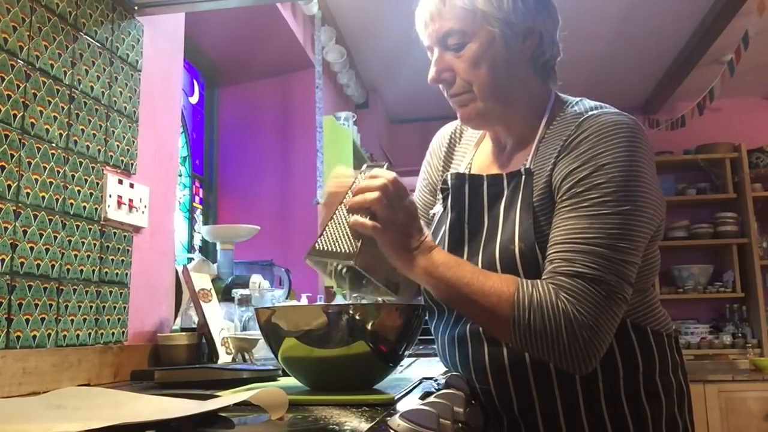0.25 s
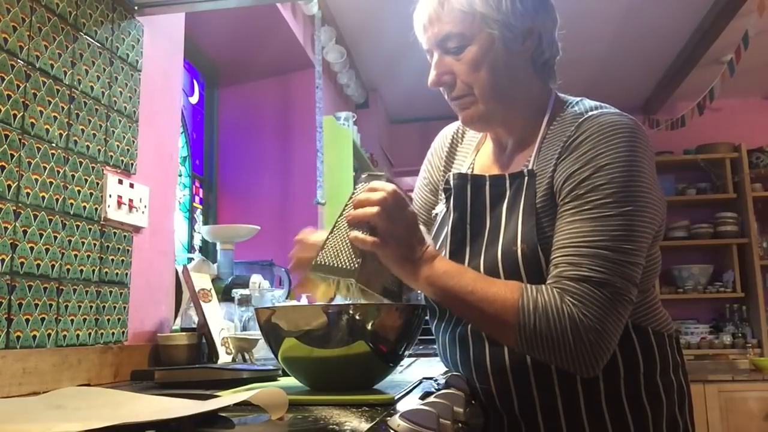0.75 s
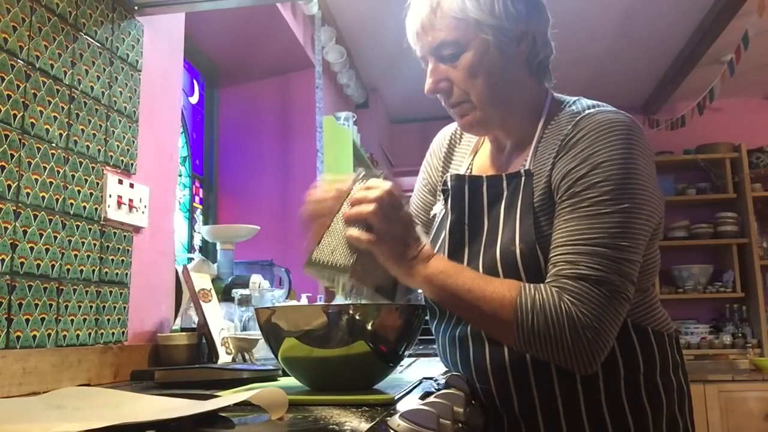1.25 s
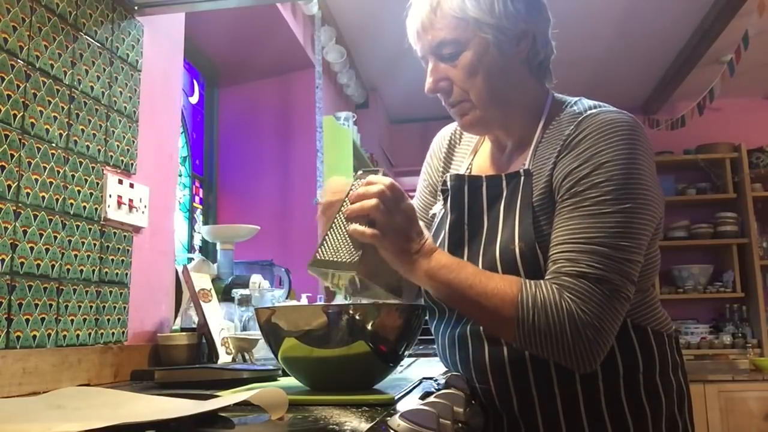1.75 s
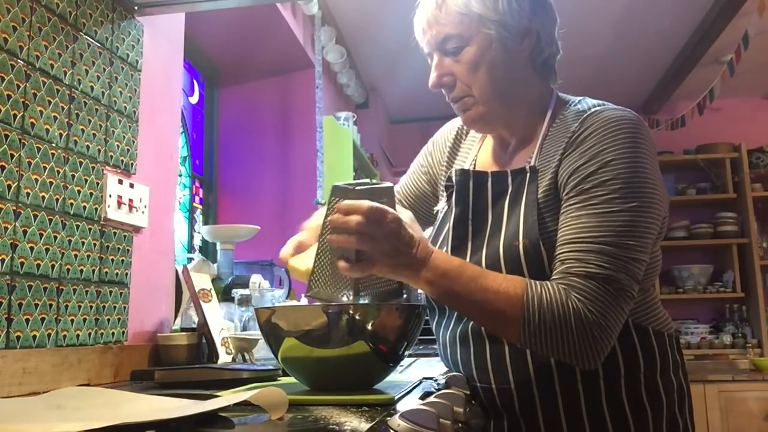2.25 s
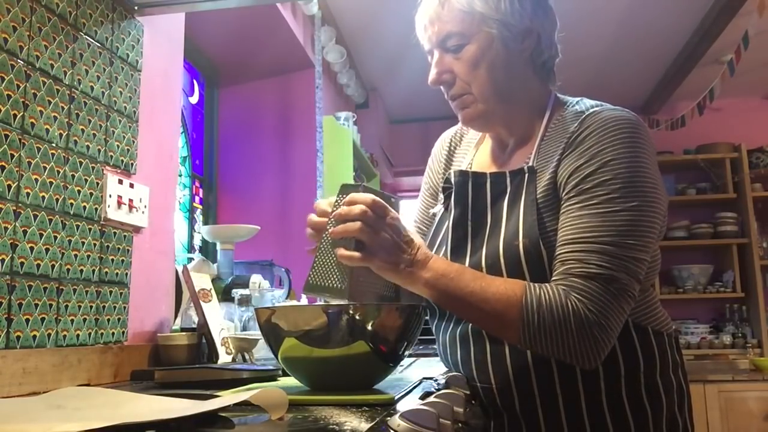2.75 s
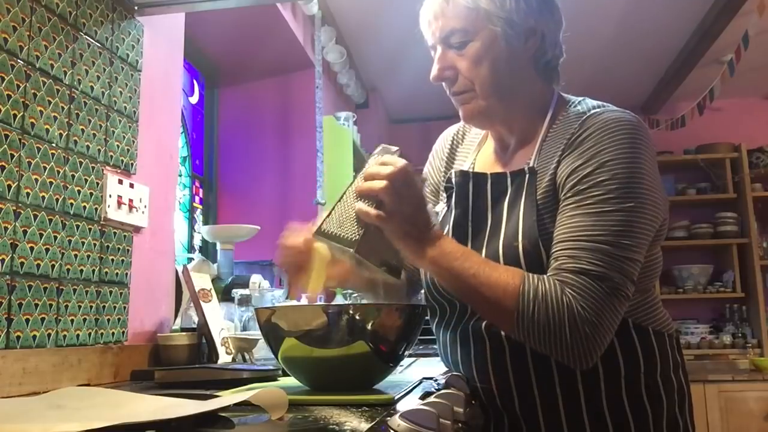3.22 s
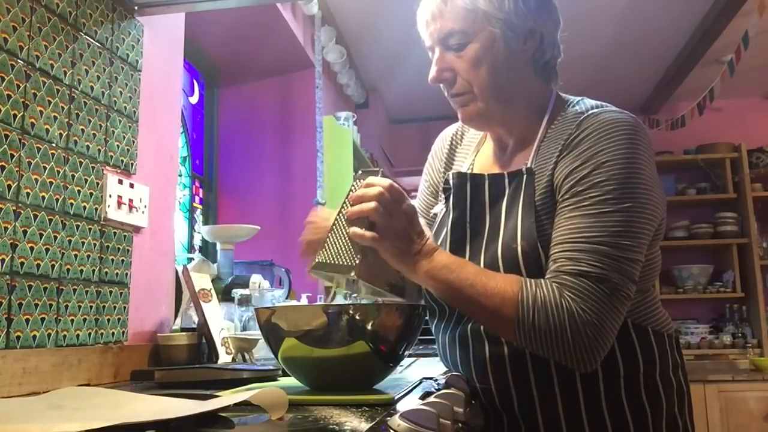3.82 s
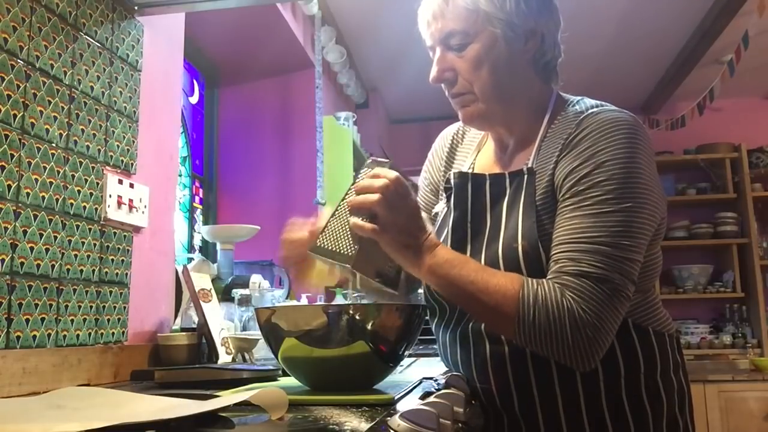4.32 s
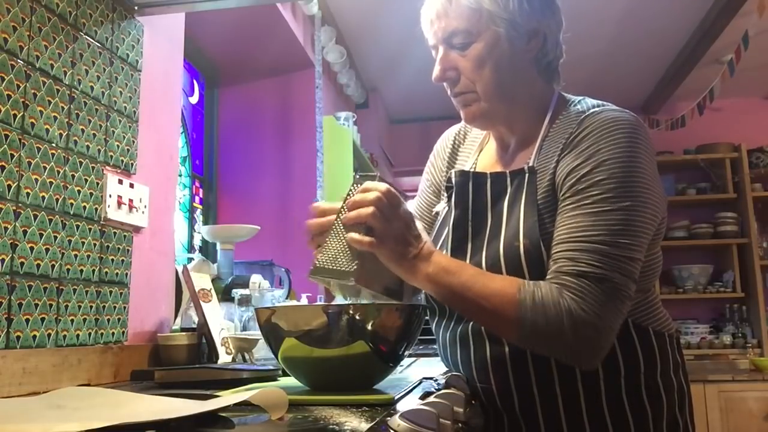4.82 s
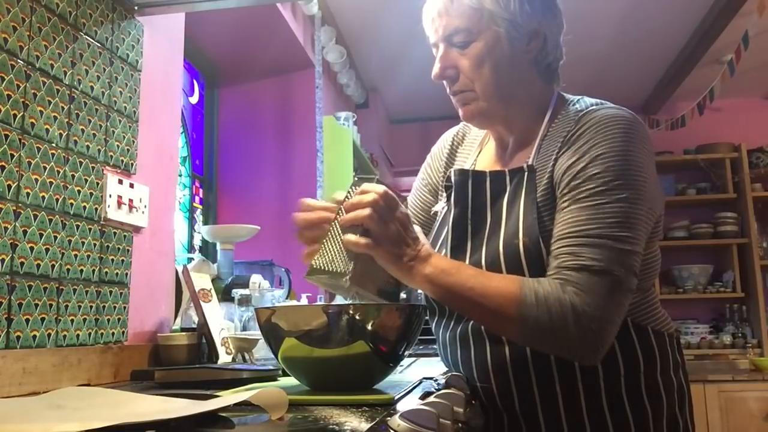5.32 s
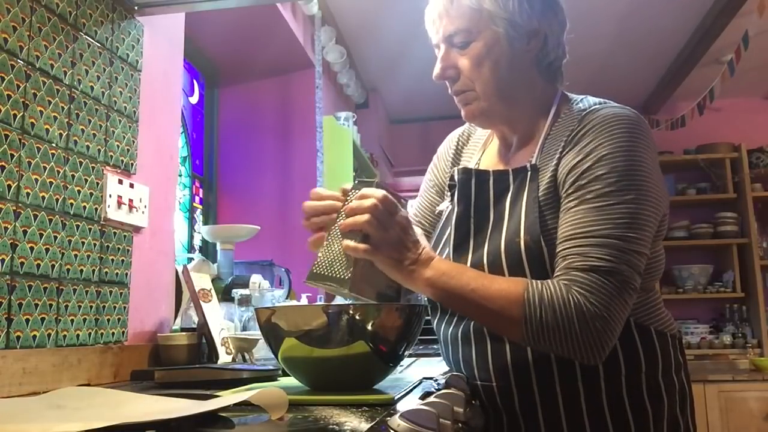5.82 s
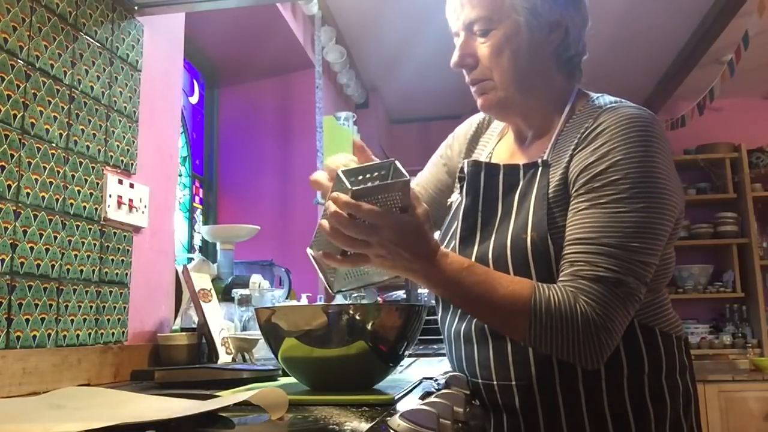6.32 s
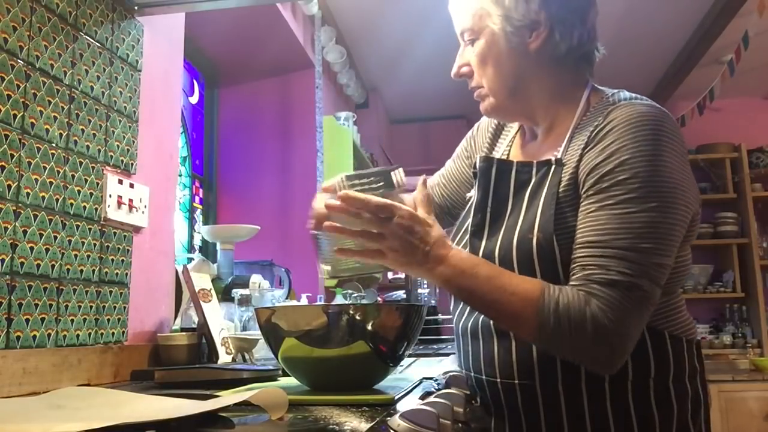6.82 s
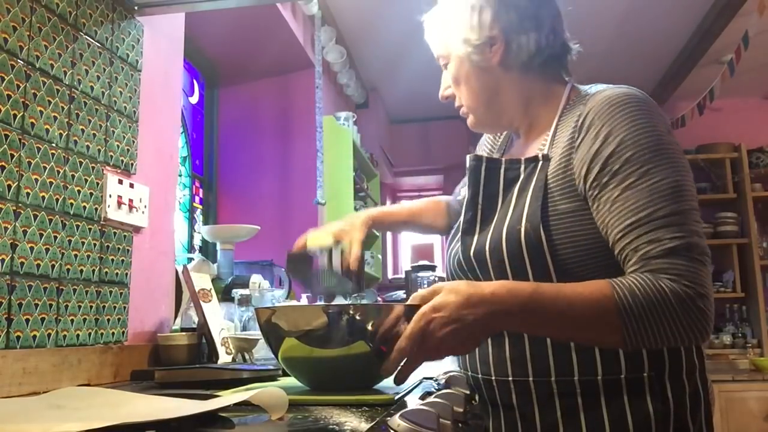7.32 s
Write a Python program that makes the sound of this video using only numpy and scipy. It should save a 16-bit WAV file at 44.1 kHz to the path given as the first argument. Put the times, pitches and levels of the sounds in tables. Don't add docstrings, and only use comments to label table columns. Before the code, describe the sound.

Rustling grater strokes with dull thuds and crisp metallic ticks, followed by loud hollow palm slaps on thin steel, over a faint low motor hum.

```python
import sys
import numpy as np
from scipy import signal
from scipy.io import wavfile
from scipy.ndimage import uniform_filter1d

SR = 44100
rng = np.random.default_rng(int(sys.argv[2]) if len(sys.argv) > 2 else 0)


def volts_from_decibels(level):
    exponent = np.asarray(level, float) / 20
    return 10 ** exponent


def persist_wave(psi):
    counts = np.round(np.clip(psi, -1, 1) * 32767).astype(np.int16)
    wavfile.write(sys.argv[1], SR, np.atleast_2d(counts).T)


N = 333837

# frequency in Hz, level in dB per Hz.
AIR_COLOUR = [(13, -58), (22, -8.5), (48, -6), (81, -3.5), (107, -2), (323, -15.5), (489, -16), (562, -24),
              (702, -18.5), (784, -23.5), (1900, -27), (2070, -30.5), (12900, -38.5), (14400, -38.5),
              (16500, -58)]
AIR_DB = -64
MAINS_HZ, SLIP_HZ, BEAT_S = 99.99, 1.43, 0.454
HUM_DB, OCTAVE_DB = -60.5, -14
ROTOR_DB = [-8.5, -24]
# resonance in Hz, level in dB, T60 in seconds.
FAN_CASING = [(149.7, -67.5, 0.16), (259.6, -74, 0.15), (1930, -85.5, .04)]

# frequency in Hz, T60 in seconds.
KITCHEN_DECAY = [(150, 0.9), (500, 0.2), (2000, 0.35), (5000, 0.32), (12000, 0.15)]
KITCHEN_TAIL_DB = -12.5
# delay in seconds, level in dB.
KITCHEN_ECHOES = [(.0035, -17.5), (.0062, -27.5), (.0098, -26), (.042, -23), (0.098, -38)]

# frequency in Hz, level in dB, T60 in seconds.
PANEL_MODES = [(395, -4, 0.18), (560, -17.5, 0.042), (665.4, 18.5, 0.083), (1054, 12, 0.082),
               (1283, 8, 0.11), (1550, -11.5, 0.021), (1880, -30, 0.14), (1930, -11, 0.036),
               (1980, -21, 0.086), (2070, -30, .07)]
# frequency in Hz, level in dB, T60 in seconds.
CLANK_MODES = [(2960, -1, 0.09), (3425, -0.5, 0.16), (3810, 11.5, 0.015), (4390, 7, 0.03),
               (4800, -9, 0.023), (5750, 5.5, 0.017), (6500, -7, 0.03)]
# frequency in Hz, level in dB, T60 in seconds.
TEETH_MODES = [(6700, -15, 0.036), (8790, -19, 0.017), (9160, 7, 0.009), (11670, 12, 0.0043),
               (12400, -3.5, .008), (12850, 16, 0.004)]
# frequency in Hz, level in dB, T60 in seconds.
RASP_MODES = [(2610, -15, 0.04), (2700, -15, 0.06)]

# middle in seconds, length in seconds, press on the panels in dB,
# scrape of the teeth in dB, hiss of the edges in dB.
STROKE_PASSES = [(0.0, 0.39, -68, -73, -71), (0.136, 0.14, -59, -72, -67.5), (0.405, 0.37, -63, -72.5, -69),
                 (0.513, 0.13, -62.5, -77, -76), (0.769, 0.11, -56, -66, -67),
                 (0.876, 0.082, -60, -61.5, -67), (1.237, 0.19, -51, -65, -62.5),
                 (1.531, 0.19, -60.5, -71, -69.5), (1.738, 0.11, -64, -84, -85),
                 (1.885, .11, -61.5, -74, -72), (2.013, 0.12, -60.5, -70, -63), (2.924, .25, -76, -77, -69),
                 (3.15, 0.16, -62, -70, -69), (3.248, 0.23, -63.5, -68, -69), (3.49, 0.38, -80, -80, -75),
                 (3.61, 0.25, -62.5, -70.5, -73), (3.871, 0.082, -63, -73, -72),
                 (3.965, 0.13, -56, -64, -65.5), (4.243, 0.29, -66.5, -75, -71),
                 (4.365, .12, -59, -71, -70), (4.629, 0.18, -59.5, -68, -61), (4.694, 0.12, -66, -88, -76),
                 (4.74, 0.055, -59.5, -64.5, -76)]
# middle in seconds, length in seconds, press, scrape and hiss in dB.
GRIP_SHIFTS = [
    (2.23, 0.21, -63.5, -78, -89),
    (2.447, 1, -74, -75, -81),
    (6.886, 0.098, -85, -68, -66.5),
    (6.99, .17, -82, -73, -69.5),
    (7.21, .1, -85, -90, -80),
]
# middle in seconds, length in seconds, level in dB.
RIND_DRAGS = [
    (2.977, 0.36, -72.5),
    (3.272, 0.54, -69),
    (3.61, 0.23, -73),
    (4.373, 0.049, -64),
    (4.742, 0.06, -69),
]
# middle in seconds, length in seconds, level in dB,
# pitch in Hz.
SINGING_PATCHES = [
    (0.103, .1, -76, 1040),
    (0.402, 0.072, -66, 2830),
    (0.773, .1, -57, 1050),
    (0.883, 0.046, -65, 5030),
    (1.214, 0.091, -66, 1040),
    (1.245, .1, -63, 1320),
    (1.537, .06, -66, 1070),
    (3.246, .15, -63, 1054),
    (6.888, .07, -62.5, 1820),
]
PATCH_T60_S = 0.05
RASP_DB, ENDS_DB, UNEVEN_DB = -8.5, -25, 2.0

# start in seconds, thud in dB, thud pitch in Hz.
CHEESE_LANDINGS = [(0.289, -53, 460), (0.655, -47.5, 510), (1.012, -50, 573), (1.39, -48.5, 476),
                   (1.789, -46.5, 518), (2.741, -57.5, 549), (3.012, -56.5, 640), (3.425, -47.5, 484),
                   (3.76, -50.5, 524), (4.122, -49, 512), (4.541, -56, 510)]
LANDING_PANEL_DB, LANDING_CLANK_DB = -21.5, -25
SLIDE_AFTER_S, SLIDE_S = 0.035, 0.038
# press in dB, scrape in dB, hiss in dB.
SLIDE_LEVELS_DB = (-13, -43, -27)
# start in seconds, thud in dB, thud pitch in Hz, panel ring in dB, clank in dB.
TEETH_CATCHES = [(0.115, -59, 495, -75, -74), (0.391, -67, 330, -64, -78), (0.49, -61, 706, -73, -75),
                 (0.524, -58, 655, -75, -84), (1.226, -57, 580, -75, -68), (1.502, -60, 655, -67, -80),
                 (1.666, -52.5, 643, -57, -64), (2.008, -59.5, 660, -78, -66.5),
                 (2.035, -59, 630, -74, -78), (2.195, -52, 630, -56, -57), (2.228, -60, 600, -65, -68),
                 (3.295, -62, 596, -65.5, -73), (3.599, -55.5, 670, -71, -73), (3.967, -58, 675, -62, -73),
                 (4.375, -67, 665, -63, -72), (4.653, -52.5, 632, -69, -80), (6.558, -57, 560, -65, -74),
                 (7.328, -59, 610, -60, -55)]
# start in seconds, thud in dB, thud pitch in Hz,
# panel ring in dB, clank in dB.
PALM_SLAPS = [
    (4.92, -26, 667, -33, -34.5),
    (5.079, -33.5, 662, -50, -52.5),
    (5.239, -36, 526, -43.5, -51.5),
    (5.398, -35, 499, -43, -48.5),
    (5.557, -30.5, 570, -36.5, -44.5),
    (5.865, -27.5, 500, -34, -43),
    (6.142, -24.5, 658, -32.5, -24),
    (6.239, -55, 364, -46, -49),
    (6.462, -47.5, 572, -48.5, -47.5),
]
MUFFLE_DB = -9
RATTLE_FROM_DB, RATTLE_GROWTH = -60, 0.3

# start in seconds, clank in dB, teeth rattle in dB,
# centre of the clank in Hz.
TOOTH_TICKS = [(0.3934, -68, -75, 2850), (0.4874, -74, -65.5, 2820), (0.6945, -63.5, -55, 4730),
               (0.8757, -60.5, -66, 5050), (0.916, -80, -66, 2090), (1.6636, -49.5, -55, 2360),
               (1.7715, -66, -70, 1860), (1.99, -66, -67, 4480), (2.085, -50.5, -39, 4600),
               (2.8773, -71, -63.5, 2630), (3.202, -88, -61.5, 2560), (3.3424, -83, -61, 2590),
               (3.455, -59.5, -59, 5210), (4.284, -62, -66, 3840), (4.57, -47.5, -45.5, 4760),
               (4.743, -73, -79, 1930), (6.361, -62.5, -60.5, 3270), (6.4642, -47, -52, 3610),
               (7.3246, -51.5, -62, 1940)]
# start in seconds, clank in dB, teeth rattle in dB,
# centre of the clank in Hz.
FINGER_BRUSHES = [
    (4.909, -58, -64, 3460),
    (5.066, -69, -60, 4000),
    (5.227, -59.5, -55, 3930),
    (5.384, -60.5, -59, 5000),
    (5.541, -65, -62, 3440),
    (5.853, -62, -53, 3500),
    (6.122, -57.5, -74, 4800),
]


def evened(x):
    return x / np.sqrt(np.mean(x ** 2) + 1e-20)


def peaked(x, db):
    return volts_from_decibels(db) * x / np.sqrt(uniform_filter1d(x ** 2, size=200).max())


def read(points, hz):
    f, value = np.transpose(points)
    return np.interp(np.log(hz + 1), np.log(f + 1), value)


def add(mix, s, sound):
    part = mix[round(s * SR):][:len(sound)]
    part += sound[:len(part)]


def band(x, lo_hz, hi_hz):
    sos = signal.butter(N=2, Wn=[lo_hz, hi_hz], btype="band", fs=SR, output="sos")
    return evened(signal.sosfilt(sos, x))


def ring(drive, modes, spread=0.0):
    t = np.arange(6000) / SR
    share_db = spread * rng.standard_normal(len(modes))
    body = np.zeros(len(t))
    for (hz, db, t60), share in zip(modes, share_db):
        body += volts_from_decibels(db + share - 60 * t / t60) * np.sin(2 * np.pi * hz * t)
    return signal.oaconvolve(drive, body / np.linalg.norm(body))[:len(drive)]


def air():
    frames, hz = N // 512 + 5, np.fft.rfftfreq(2048, 1 / SR)
    real, imaginary, patches = rng.standard_normal((frames, 1025, 3)).T
    patches = uniform_filter1d(patches, size=14, axis=0)
    patches = evened(uniform_filter1d(patches, size=8, axis=1))
    spectrum = (real + 1j * imaginary) * volts_from_decibels(read(AIR_COLOUR, hz)[:, None] + 1.5 * patches)
    noise = signal.istft(spectrum, nperseg=2048, noverlap=1536)[1][:N]
    return volts_from_decibels(AIR_DB) * evened(noise)


def hum():
    turn = 2 * np.pi * (np.arange(N) / SR - BEAT_S)
    tone = np.cos(MAINS_HZ * turn) + volts_from_decibels(OCTAVE_DB) * np.cos(2 * MAINS_HZ * turn)
    for slips, db in enumerate(ROTOR_DB, start=1):
        tone += volts_from_decibels(db) * np.cos((MAINS_HZ - slips * SLIP_HZ) * turn)
    fan = np.zeros(N)
    for hz, db, t60 in FAN_CASING:
        fan += volts_from_decibels(db) * evened(ring(rng.standard_normal(N), [(hz, 0, t60)]))
    return volts_from_decibels(HUM_DB) * tone + fan


def kitchen(x):
    noise = rng.standard_normal(SR // 2)
    hz, t, z = signal.stft(noise, SR, nperseg=256)
    fading = z * volts_from_decibels(-60 * t / read(KITCHEN_DECAY, hz)[:, None])
    tail = signal.istft(fading, SR, nperseg=256)[1]
    tail *= np.clip(np.arange(len(tail)) / SR / 0.011, 0, 1)
    tail *= volts_from_decibels(KITCHEN_TAIL_DB) / np.linalg.norm(tail)
    tail[0] = 1
    for k, (s, db) in enumerate(KITCHEN_ECHOES):
        tail[round(s * SR)] += (-1) ** k * volts_from_decibels(db)
    return signal.fftconvolve(x, tail)[:N]


def motion(middle, length, db):
    t = np.arange(0, N, 64) / SR
    off = 2 * abs(t[:, None] - middle) / length
    swell = volts_from_decibels(db + ENDS_DB * off ** 1.23).sum(1)
    return np.interp(np.arange(N) / SR, t, swell)


def strokes():
    slips = rng.standard_normal((4, N)) * volts_from_decibels(2.2 * rng.exponential(1, N))
    slips *= rng.random(N) < 4500 / SR
    panels = evened(ring(slips[0], PANEL_MODES[2:5]) + 0.11 * band(slips[0], 210, 2250))
    rasp = evened(evened(ring(slips[1], RASP_MODES)) + 0.27 * band(slips[1], 2400, 2450))
    scrape = evened(0.5 * evened(ring(slips[2], CLANK_MODES)) + band(slips[2], 1400, 4600))
    hiss = evened(0.5 * evened(ring(slips[3], TEETH_MODES)) + band(slips[3], 6700, 14000))

    slides = [(s + SLIDE_AFTER_S, SLIDE_S, *(db + np.array(SLIDE_LEVELS_DB))) for s, db, _ in CHEESE_LANDINGS]
    passes = [*STROKE_PASSES, *GRIP_SHIFTS, *slides]
    middle, length, press_db, scrape_db, hiss_db = np.transpose(passes)
    unsteady = evened(uniform_filter1d(rng.standard_normal(N), size=400))
    jerks = volts_from_decibels(UNEVEN_DB * unsteady - 6.5)

    out = panels * motion(middle, length, press_db)
    out += scrape * motion(middle, length, scrape_db)
    out += rasp * (motion(middle, length, scrape_db + RASP_DB) + motion(*np.transpose(RIND_DRAGS)))
    for s, span, db, hz in SINGING_PATCHES:
        out += evened(ring(slips[1], [(hz, 0, PATCH_T60_S)])) * motion(s, span, db)
    out += hiss * motion(middle, length, hiss_db)
    return out * jerks


def spray(t60, rise, linger_db, linger_t60):
    t = np.arange(16000) / SR
    size_db = 2.6 * np.minimum(rng.exponential(1, len(t)), 3)
    shiver_db = 3.5 * evened(uniform_filter1d(rng.standard_normal(len(t)), size=300))
    burst = volts_from_decibels(size_db - 60 * t / t60)
    shiver = volts_from_decibels(linger_db + shiver_db - 60 * t / linger_t60)
    return rng.standard_normal(len(t)) * (burst + shiver) * (1 - np.exp(-t / rise))


def snap(clank_db, teeth_db, hz, t60, rise, octaves):
    wall, edge = (spray(t60, rise, linger_db=-10.0, linger_t60=0.26) for _ in range(2))
    clank = 0.15 * evened(ring(wall, RASP_MODES + CLANK_MODES, spread=1.5)) + evened(wall)
    clank = band(clank, hz / 2 ** octaves, hz * 2 ** octaves)
    crack = band(edge - 0.5 * np.roll(edge, 1), 6000, 15000)
    teeth = 0.3 * evened(ring(edge, TEETH_MODES, spread=4)) + crack
    return peaked(clank, clank_db - 2.5) + peaked(teeth, teeth_db - 5)


def blow(thud_db, hz, panel_db, clank_db, muffle_db=0):
    slap = spray(0.062, rise=0.006, linger_db=-15, linger_t60=0.14)
    t = np.arange(len(slap)) / SR
    thud = np.sin(2 * np.pi * hz * t) * (1 - np.exp(-t / 0.003)) * volts_from_decibels(-60 * t / 0.038)
    side = np.sin(2 * np.pi * 380 * t) * (1 - np.exp(-t / 0.0049)) * volts_from_decibels(-60 * t / 0.1)
    push = np.sin(2 * np.pi * 160 * t) * t * np.exp(-t / 0.0046)
    low = 0.7 * evened(ring(slap, PANEL_MODES[:3], spread=2.8)) + band(slap, 351, 900)
    high = 0.4 * evened(ring(slap, PANEL_MODES[3:], spread=4))
    high += band(slap, 780, 1700) + 0.3 * band(slap, 1700, 2400)

    hollow = peaked(thud, thud_db - 6) + peaked(low, thud_db - 8.5) + peaked(push, thud_db - 19.5)
    hollow += peaked(side, thud_db - 15 - 0.045 * (hz - 560))
    hollow += peaked(band(slap, 210, 330), thud_db - 20)
    teeth_db = clank_db + muffle_db + RATTLE_GROWTH * (clank_db - RATTLE_FROM_DB)
    rattle = snap(clank_db, teeth_db, hz=3800, t60=0.05, rise=0.001, octaves=0.8)
    return hollow + peaked(high, panel_db - 3) + rattle


def scene():
    grater = strokes()
    for s, db, hz in CHEESE_LANDINGS:
        add(grater, s, blow(db, hz, db + LANDING_PANEL_DB, db + LANDING_CLANK_DB))
    for s, *row in TEETH_CATCHES:
        add(grater, s, blow(*row, muffle_db=MUFFLE_DB))
    for s, *row in PALM_SLAPS:
        add(grater, s, blow(*row))
    for s, *row in TOOTH_TICKS:
        add(grater, s, snap(*row, t60=0.061, rise=0.00051, octaves=0.6))
    for s, *row in FINGER_BRUSHES:
        add(grater, s, snap(*row, t60=0.13, rise=0.012, octaves=1.0))
    return (kitchen(grater) + hum() + air())[None]


def band_limit(x):
    return signal.sosfilt(signal.butter(12, 16830, fs=SR, output="sos"), x)


def record(dry):
    bass_cut = signal.butter(N=2, Wn=45, btype="high", fs=SR, output="sos")
    top_cut = signal.firwin(255, 15900, window=("kaiser", 9), fs=SR)
    miked = signal.sosfilt(bass_cut, dry)
    miked = signal.oaconvolve(miked, top_cut[None], "same")
    return band_limit(miked)


dry = scene()
out = record(dry)
persist_wave(out)
```